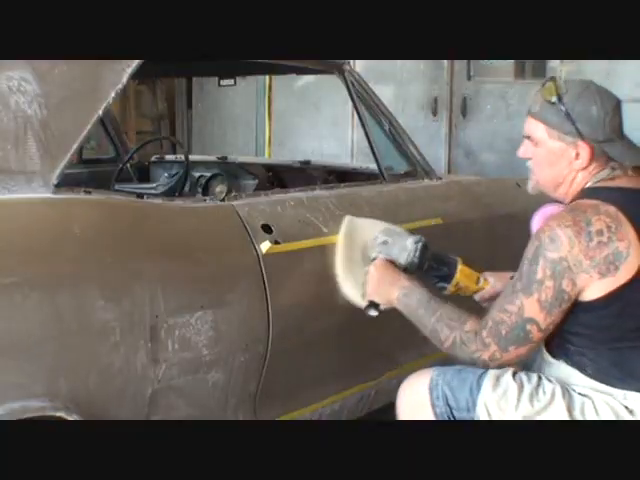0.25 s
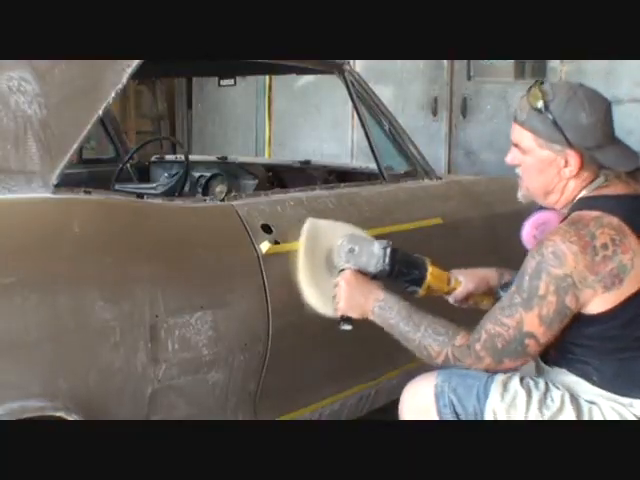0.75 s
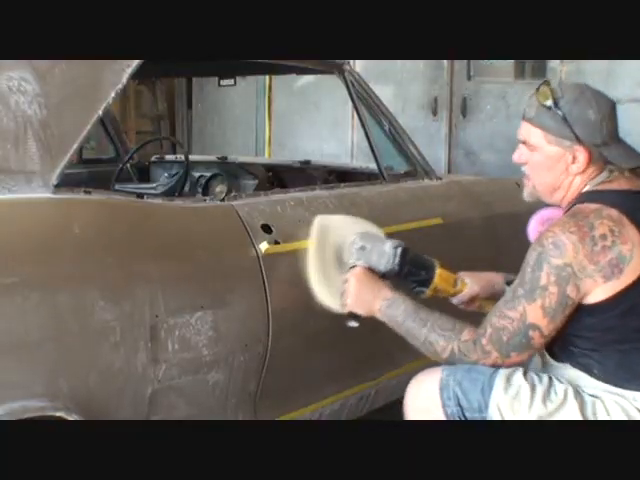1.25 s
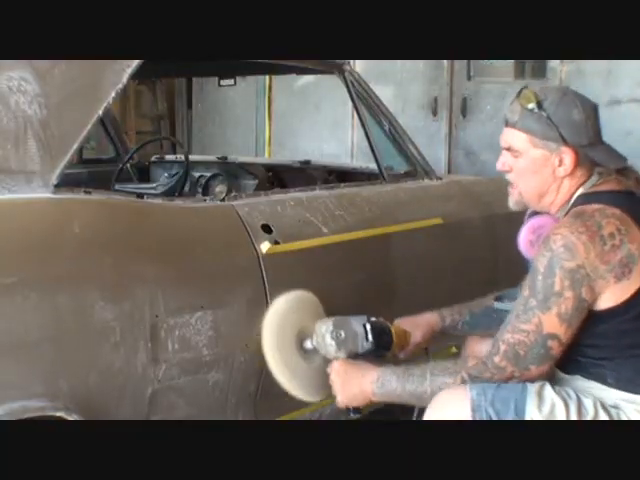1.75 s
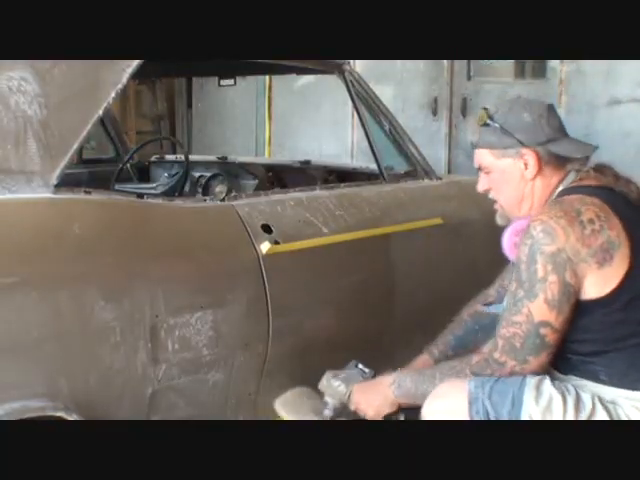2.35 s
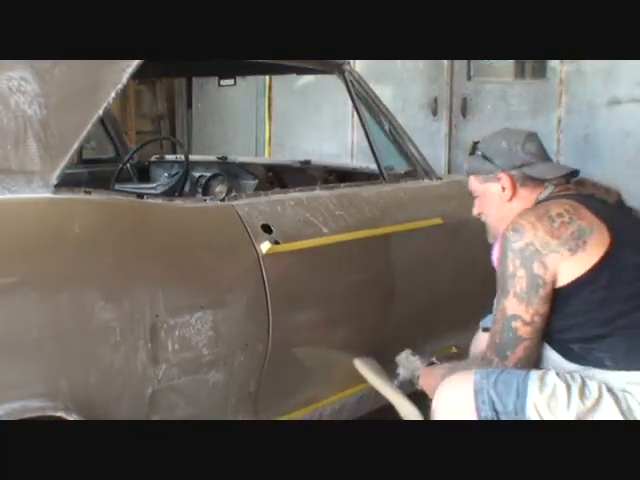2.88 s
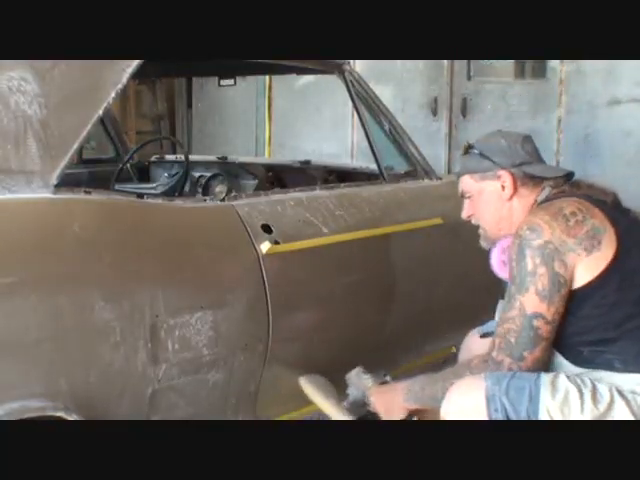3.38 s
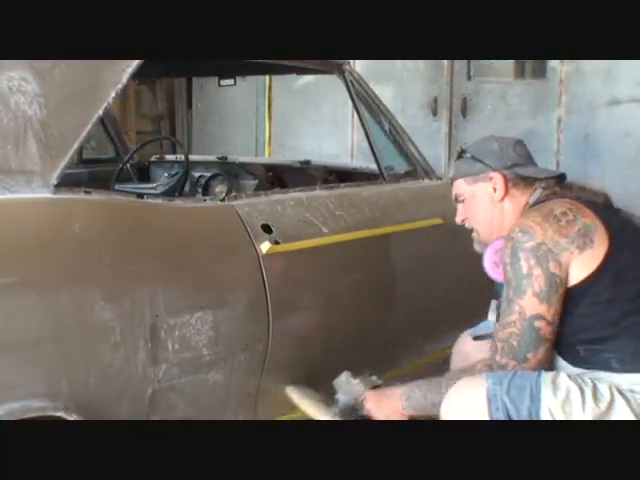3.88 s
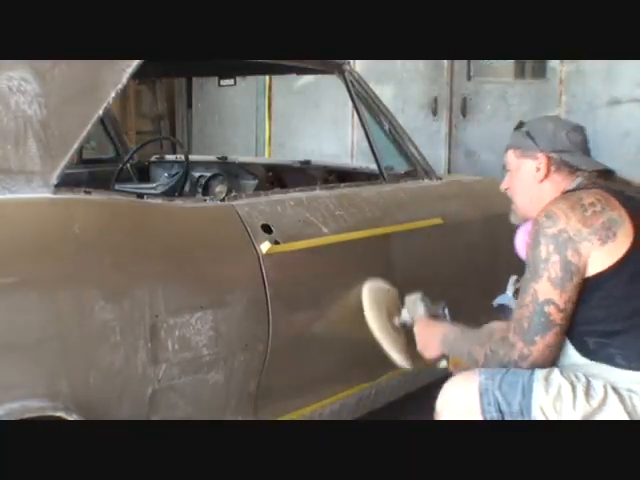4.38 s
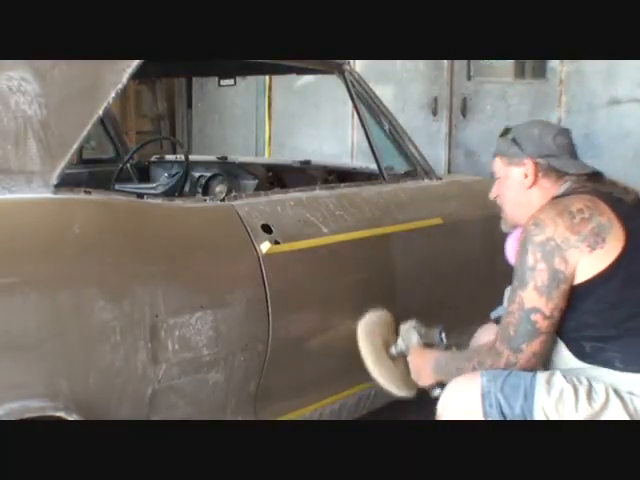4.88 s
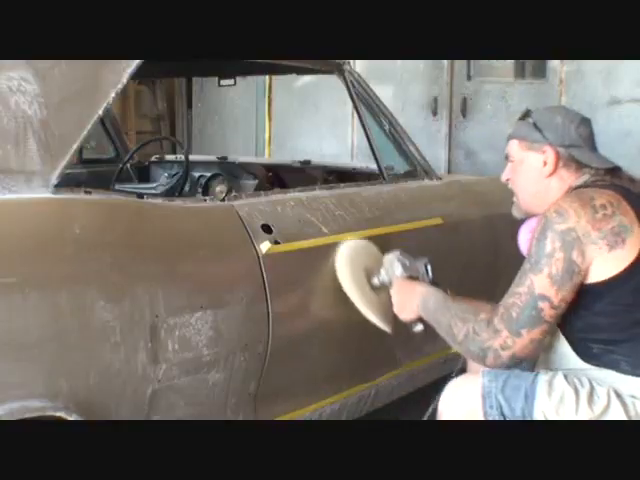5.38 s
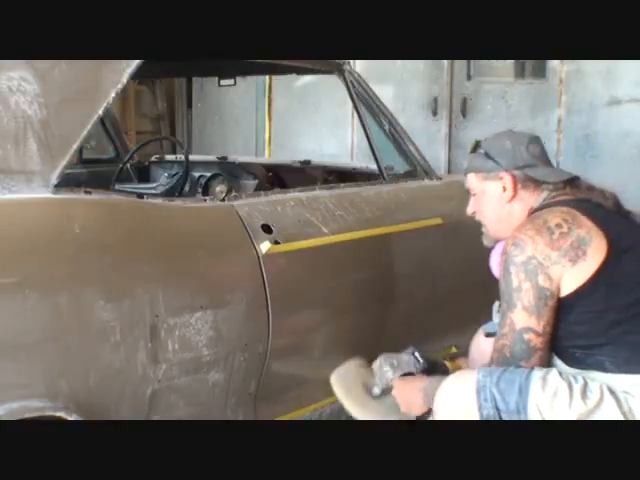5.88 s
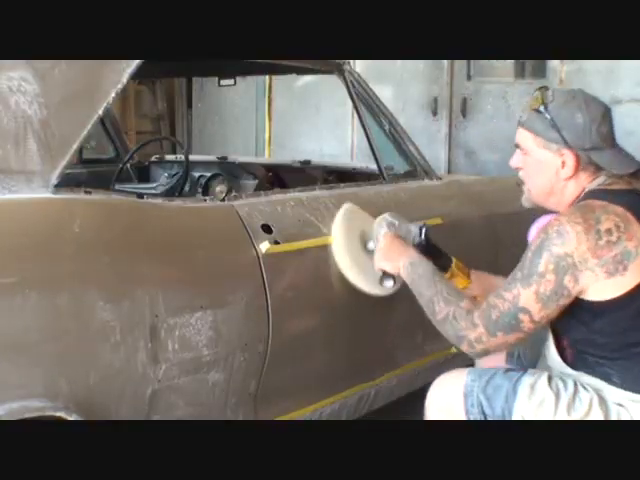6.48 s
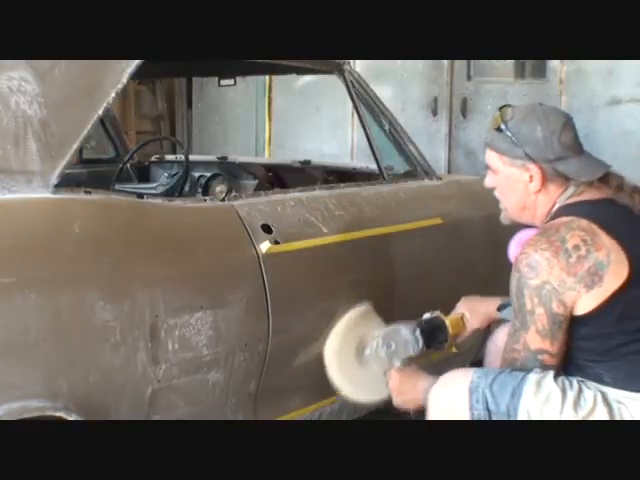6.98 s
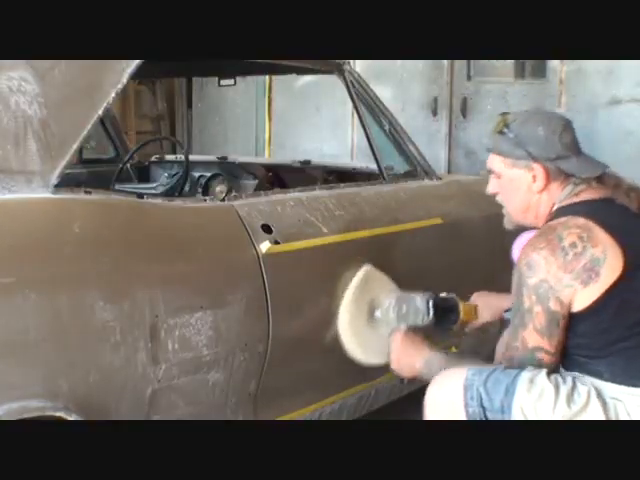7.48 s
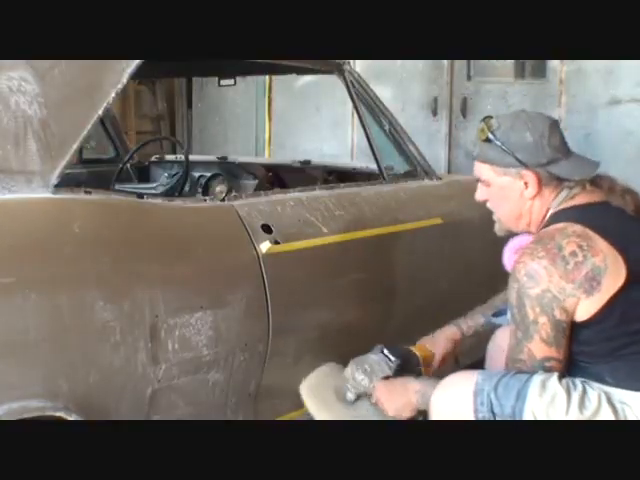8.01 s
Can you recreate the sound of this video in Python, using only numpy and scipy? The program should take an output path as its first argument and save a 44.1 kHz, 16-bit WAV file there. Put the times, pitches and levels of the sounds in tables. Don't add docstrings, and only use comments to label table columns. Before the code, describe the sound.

Continuous power buffer whine around fifteen hundred hertz, sagging and surging under hand pressure, with rushing pad friction and motor hiss against car paint.

```python
import sys
import numpy as np
from scipy import signal
from scipy.fft import rfft, irfft
from scipy.io import wavfile
from scipy.ndimage import uniform_filter1d, map_coordinates

SR = 44100
rng = np.random.default_rng(int(sys.argv[2]) if len(sys.argv) > 2 else 0)


def unload_wav(signal):
    wavfile.write(
        sys.argv[1],
        SR,
        np.round(np.clip(np.atleast_2d(signal).T, -1, 1) * 32767).astype(np.int16),
    )


def field_ratio(decibels):
    return 10 ** (np.asarray(decibels, dtype=float) / 20)


N = 363825
TEETH = 6
# (t/s, half width/s, mesh tone change/dB)
MESH_FADES = [(0.18, 0.022, -6), (0.52, 0.1, 2), (0.7, 0.11, -3.6), (0.89, 0.023, 4), (1.7, 0.09, -10.9),
              (1.9, 0.056, -14), (2.21, 0.024, -3.8), (2.81, 0.025, -7), (3.21, 0.017, -9),
              (3.58, 0.043, 2.2), (3.71, 0.04, -3.5), (3.87, 0.088, 7), (4.03, 0.025, -8.7),
              (4.39, 0.04, -11), (4.61, 0.089, -6.5), (4.79, 0.061, -2.5), (4.91, 0.041, -8),
              (5.46, 0.059, -10.5), (5.55, 0.019, -11), (5.66, 0.046, -12), (5.83, 0.06, -13.5),
              (6.03, 0.026, -5), (6.14, 0.022, -16), (6.38, 0.04, -12), (6.71, 0.028, 4.5),
              (6.87, 0.03, -10), (6.92, 0.024, 3), (7.06, 0.02, -22), (7.57, 0.12, -3.1), (8.23, 0.065, -8)]


def unit(x):
    return x / np.sqrt(np.mean(x ** 2) + 1e-20)


def curve(rows):
    s, values = np.transpose(rows)
    return np.interp(np.arange(N) / SR, s, values)


def bumps(rows):
    t = np.arange(0, N + 64, 64) / SR
    total = sum(size * np.exp(-((t - s) / width) ** 2) for s, width, size in rows)
    return np.interp(np.arange(N) / SR, t, total)


def wobble(rate_hz, count=N):
    coarse = np.arange(0, count + 16, 16)
    knots = rng.standard_normal(4000)
    values = map_coordinates(knots, [coarse * min(rate_hz, 400) / SR])
    return np.interp(np.arange(count), coarse, values)


def rush(spectrum, patchy_db, size=(5, 12)):
    _, _, z = signal.stft(rng.standard_normal(N + 512), SR, nperseg=512)
    field = uniform_filter1d(rng.standard_normal(z.shape), size[0], axis=0)
    field = uniform_filter1d(field, size[1], axis=1)
    x = signal.istft(z * field_ratio(patchy_db * unit(field)), nperseg=512)[1]
    hz, db = np.transpose(spectrum)
    log_bins = np.log(np.fft.rfftfreq(len(x), 1 / SR) + 1)
    colour = field_ratio(np.interp(log_bins, np.log(hz), db))
    return unit(irfft(rfft(x) * colour, len(x))[:N])


def blurred(phase, blur_hz):
    in_phase = wobble(blur_hz, len(phase)) * np.cos(phase)
    quadrature = wobble(blur_hz, len(phase)) * np.sin(phase)
    return unit(in_phase + quadrature)


def speed_hz():
    # (t/s, mesh f/Hz)
    drift = [(0.0, 1520), (0.5, 1553), (0.93, 1572), (1.6, 1613), (2.0, 1592), (2.3, 1546), (2.75, 1566),
             (3.3, 1501), (3.85, 1541), (4.3, 1571), (4.9, 1583), (5.5, 1575), (6.0, 1554), (6.6, 1591),
             (7.15, 1557), (7.75, 1579), (8.25, 1520)]
    # (t/s, half width/s, mesh change/Hz)
    nudges = [(0.18, 0.043, -20), (0.29, 0.075, -67), (0.7, 0.1, 22), (0.96, 0.03, -12), (1.05, 0.072, -26),
              (1.21, 0.1, -71), (1.27, 0.029, -22), (1.51, 0.044, -25), (1.89, 0.03, 21),
              (2.62, 0.068, -38), (2.84, 0.045, 14), (3.03, 0.045, -12), (3.29, 0.044, 31),
              (3.55, 0.071, -24), (4.09, 0.068, 24), (4.75, 0.07, 15), (5.06, 0.046, -29),
              (5.22, 0.14, -70), (5.4, 0.03, -34), (5.67, 0.07, 36), (6.11, 0.03, 24), (6.23, 0.07, -65),
              (6.47, 0.046, -17), (6.82, 0.045, -19), (7.24, 0.031, 35), (7.46, 0.03, 12),
              (7.56, 0.043, -26), (7.89, 0.03, -28.5), (8.01, 0.067, -46), (8.1, 0.028, -20)]
    return curve(drift) + bumps(nudges)


def mesh_phase():
    return 2 * np.pi * np.cumsum(speed_hz()) / SR


def mesh_level_db():
    # (t/s, mesh tone level/dB)
    facing = [(0.0, -10.5), (1.03, -10), (2.06, -11.5), (3.09, -8.5), (4.12, -13), (5.16, -8.5),
              (6.19, -10), (7.22, -14.0), (8.25, -10.5)]
    return curve(facing) + bumps(MESH_FADES)


def air_level_db():
    # (t/s, hiss level/dB)
    nearness = [(0.0, -21.5), (0.55, -24), (1.1, -24), (1.65, -23), (2.2, -22.5), (2.75, -23), (3.3, -25.5),
                (3.85, -25), (4.4, -24.5), (4.95, -23), (5.5, -24.5), (6.05, -21), (6.6, -23.5),
                (7.15, -21), (7.7, -22.5), (8.25, -24)]
    # (t/s, half width/s, hiss change/dB)
    gusts = [(0.66, 0.027, 0.5), (1.32, 0.075, 1.5), (2.33, 0.051, -4.5), (2.75, 0.03, 2.4),
             (2.96, 0.022, 3), (3.05, 0.053, -5.5), (3.31, 0.028, 3), (3.81, 0.079, 0), (4.1, 0.048, -1.5),
             (5.15, 0.031, -3.5), (6.1, 0.043, -4), (6.28, 0.032, -2), (6.71, 0.14, 2), (7.14, 0.024, -0.5),
             (7.35, 0.03, -3), (7.5, 0.028, -3.9), (7.66, 0.15, 1.3), (8.07, 0.05, 2.8)]
    loud_mesh_db, duck_db = -9.5, 2.5
    duck = duck_db * field_ratio(2 * (mesh_level_db() - loud_mesh_db))
    return curve(nearness) + bumps(gusts) - duck


def follower_db(over_db, share, per_100_hz_db, wander_db):
    free_hz = 1560
    air_db = air_level_db()
    mean_db = air_db.mean()
    swing_db = share * (air_db - mean_db)
    speed_db = per_100_hz_db * (speed_hz() - free_hz) / 100
    return mean_db + over_db + swing_db + speed_db + wander_db * wobble(7)


def handling():
    # (f/Hz, level/dB per Hz)
    rumble = [(15, -14), (25, 1), (100, -2), (170, 3), (260, -14), (400, -73)]
    return field_ratio(-66.5 + 5.5 * wobble(7.2)) * rush(rumble, patchy_db=3.0)


def door_drumming():
    # (f/Hz, level/dB per Hz)
    door_spectrum = [(15, -70), (100, -50), (170, -23.5), (289, -16), (382, -11.5), (486, -3), (720, -1.5),
                     (940, -13), (1580, -120)]
    level_db = follower_db(over_db=-11, share=0.5, per_100_hz_db=-3.5, wander_db=2.14)
    return field_ratio(level_db + 0.84 * wobble(12)) * rush(door_spectrum, patchy_db=2.0, size=(2, 20))


def pad_rub(flutter_db):
    # (f/Hz, level/dB per Hz)
    pad_spectrum = [(560, -34), (720, -6), (900, -2), (1030, 1), (1330, -0.5), (1450, -17), (1800, -42)]
    level_db = follower_db(over_db=-1.78, share=0.78, per_100_hz_db=0.065, wander_db=0.65)
    return field_ratio(level_db + 0.85 * flutter_db) * rush(pad_spectrum, patchy_db=1.0)


def housing_rattle(flutter_db):
    # (f/Hz, level/dB per Hz)
    housing_spectrum = [(1250, -48), (1400, 1), (1800, 1), (2200, -1.5), (2550, -1), (2900, 0.5),
                        (3300, -2), (4200, -21), (6000, -47)]
    level_db = follower_db(over_db=4.82, share=0.83, per_100_hz_db=1.8, wander_db=0.7)
    return field_ratio(level_db + 0.59 * flutter_db) * rush(housing_spectrum, patchy_db=2.5, size=(1, 24))


def cooling_air(flutter_db):
    # (f/Hz, level/dB per Hz)
    air_spectrum = [(1940, -35), (3300, 0.5), (3410, -32), (3640, -4), (4590, -2), (5000, -2.5), (5440, -3),
                    (7230, -4), (9250, -8.5), (12500, -20.5), (13800, -22.5), (15500, -30)]
    shaft = mesh_phase() / TEETH
    pulsing = 1 + 0.057 * np.cos(shaft) + 0.092 * np.cos(2 * shaft) + 0.22 * np.cos(TEETH * shaft)
    return field_ratio(air_level_db() + 2.5 + flutter_db) * pulsing * rush(air_spectrum, patchy_db=1.0)


def rushes():
    flutter_db = 0.23 * wobble(6.9) + 0.21 * wobble(50) + 1.58 * wobble(150)
    return door_drumming() + pad_rub(flutter_db) + housing_rattle(flutter_db) + cooling_air(flutter_db)


def passing():
    # (start/s, end/s, multiple of the mesh rate, level/dB)
    passing_tones = [(1.471, 1.95, .582, -26.5), (1.51, 2.02, 1.585, -21.5), (1.6, 2, 1.43, -31),
                     (0.04, 0.43, .675, -27), (0.95, 1.56, .672, -30), (4.5, 5.049, .667, -33),
                     (5.35, 5.9, .667, -33), (6.399, 7.64, .667, -34), (1.23, 1.5, 1.33, -29),
                     (1.94, 2.63, 1.33, -26.5), (4.304, 5.2, 1.33, -29), (6.303, 7.794, 1.33, -31),
                     (5.5, 6.2, 1.67, -32), (6.595, 7.3, 1.6, -27.5), (7.15, 7.2, 1.6, -30),
                     (7.45, 8.1, 1.62, -27), (2.55, 2.9, 1.077, -23), (1.9, 2.3, 1.073, -28),
                     (1.55, 1.85, .928, -24), (1.55, 1.8, 1.035, -21), (0.6, 0.85, .962, -23.5),
                     (5.9, 6.15, .93, -26), (0.05, 0.35, 4.95, -29.5), (3.2, 3.9, 3.5, -33)]
    out, phase = np.zeros(N), mesh_phase()
    for start, end, multiple, db in passing_tones:
        span = slice(round(start * SR), round(end * SR))
        turn = multiple * phase[span]
        tone = 0.75 * np.sin(turn) + 0.61 * blurred(turn, blur_hz=40.27)
        out[span] += field_ratio(db) * signal.windows.tukey(len(turn), 0.35) * tone
    return out


def armature():
    # (shaft order, level over the hiss/dB, blur/Hz)
    shaft_orders = [(5.03, -15.5, 30), (7.38, -13, 23), (10.83, -34, 47), (15.03, -25, 40),
                    (15.87, -15, 40), (19.92, -15.5, 85), (22.13, -13, 46), (23.2, -17.5, 60),
                    (24.86, -14, 87), (26.2, -23, 70), (26.2, -36, 62), (26.96, -13, 64), (31.6, -19, 160),
                    (35.55, -17.5, 350), (40.2, -22, 350)]
    blades = 21
    shaft = mesh_phase() / TEETH
    orders = sum(field_ratio(db + 2.5 * wobble(5)) * blurred(order * shaft, blur_hz)
                 for order, db, blur_hz in shaft_orders)
    fan_db = follower_db(over_db=-7.5, share=1.7, per_100_hz_db=6, wander_db=-0.5)
    fan = field_ratio(fan_db) * blurred(blades * shaft, blur_hz=84.7)
    return field_ratio(air_level_db()) * orders + fan


def run_out_sides(phase, wheel_beat):
    trade = 0.3
    out = np.zeros(N)
    for beats, db in zip((-2, -1, 1, 2), (-30.5, -29, -31, -31)):
        level_db = db - trade * bumps(MESH_FADES) + 3 * wobble(4)
        out += field_ratio(level_db) * blurred((1 + beats * wheel_beat) * phase, blur_hz=24.1)
    return out


def mesh_octave(phase, wheel_beat):
    # (t/s, level/dB)
    octave_level = [(0.0, -28), (8.25, -15.5)]
    # (t/s, half width/s, change/dB)
    octave_fades = [(0.28, 0.073, 8.5), (0.68, 0.23, 4), (1.06, 0.016, 16), (1.83, 0.051, 5.5),
                    (2.31, 0.19, 7), (2.67, 0.032, -17), (2.89, 0.07, 4.5), (3.09, 0.087, -3),
                    (3.4, 0.03, 5.5), (3.68, 0.058, 4), (3.91, 0.084, -6), (4.1, 0.037, 5),
                    (4.27, 0.054, -6), (4.56, 0.03, -9), (4.74, 0.052, -8), (5.09, 0.12, -7.4),
                    (5.33, 0.086, -8), (5.59, 0.13, -7), (5.92, 0.13, -4), (6.24, 0.08, -4.5),
                    (6.43, 0.075, 2.5), (6.78, 0.067, -9), (6.93, 0.032, -14), (7.13, 0.024, -12),
                    (7.27, 0.031, -8), (7.44, 0.03, -10), (7.72, 0.092, -14), (8.04, 0.065, -10)]
    level_db = curve(octave_level) + bumps(octave_fades) + 2.5 * wobble(36)
    tone = np.sqrt(2) * np.sin(2 * phase + 0.8 * wobble(32))
    beat = wheel_beat * phase
    beating = 1 + 0.38 * np.cos(beat + wobble(11)) + 0.11 * np.cos(2 * beat + wobble(16))
    return field_ratio(level_db) * tone * beating


def tooth_mesh(phase):
    # (t/s, mesh tone change/dB)
    skips = [(0.287, -11), (0.659, -10), (0.773, -7), (1.379, -13), (1.546, -20), (1.596, -11),
             (2.397, -4.7), (2.517, -18), (4.577, 6), (5.428, -23), (5.622, -8), (5.686, -19), (5.799, -5),
             (6.238, -18), (6.286, -12), (6.807, -21), (7.029, -17), (7.164, 2), (7.231, -7), (7.311, -9.1),
             (7.421, -9), (7.478, -18), (7.525, -7), (7.635, -12), (7.712, -20), (7.79, -12), (7.865, -3),
             (8.029, -9)]
    skip_half_width_s = 0.0066
    mesh_db = mesh_level_db()
    backlash_db = np.clip(-8 - uniform_filter1d(mesh_db, size=13000), 0, 8)
    chatter_db = 0.3 * backlash_db * wobble(36)
    skip_db = bumps([(s, skip_half_width_s, db) for s, db in skips])
    return field_ratio(mesh_db + skip_db + chatter_db) * np.sqrt(2) * np.sin(phase)


def gears():
    wheel_beat = 0.0357
    phase = mesh_phase() + 0.45 * wobble(16)
    uneven_teeth = field_ratio(-26) * blurred(phase, blur_hz=60)
    third = field_ratio(-33.5 + 2.5 * wobble(3.84)) * blurred(3 * phase, blur_hz=80.0)
    harmonics = mesh_octave(phase, wheel_beat) + third
    return tooth_mesh(phase) + uneven_teeth + harmonics + run_out_sides(phase, wheel_beat)


def garage(x):
    t60_s = 1
    t = np.arange(SR // 2) / SR
    tail = rng.standard_normal(len(t)) * field_ratio(-60 * t / t60_s)
    return signal.fftconvolve(x, tail / np.linalg.norm(tail))[:N]


def scene():
    tones = gears() + armature() + passing()
    mix = tones + field_ratio(-16) * garage(tones) + rushes() + handling()
    return mix[None]


def top_cut(x):
    return signal.sosfilt(signal.butter(12, 15680, fs=SR, output="sos"), x)


def record(dry):
    power = dry ** 2
    quick = np.abs(uniform_filter1d(power, size=500))
    slow = np.abs(uniform_filter1d(power, size=9000))
    swell = quick / (slow + 1e-9)
    x = dry * (swell + 1e-3) ** -0.2
    x = x / (1 + np.abs(x / 1.07) ** 4) ** (1 / 4)
    x = signal.lfilter(*signal.butter(1, 85 / (SR / 2), "high"), x)
    return top_cut(x)


dry = scene()
out = record(dry)
unload_wav(out)
```